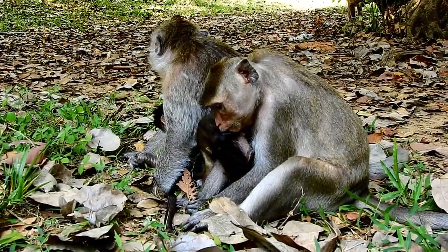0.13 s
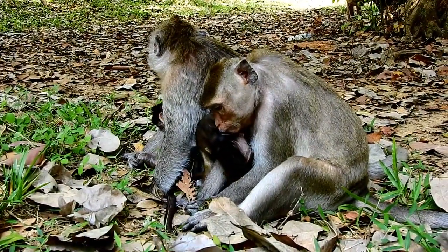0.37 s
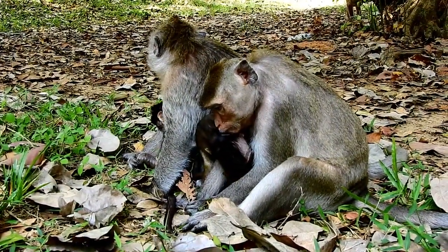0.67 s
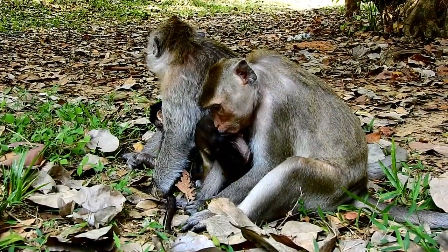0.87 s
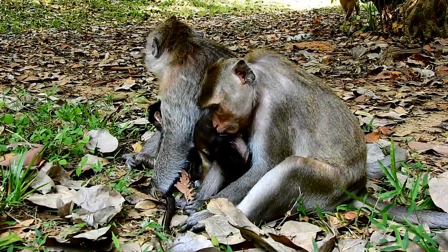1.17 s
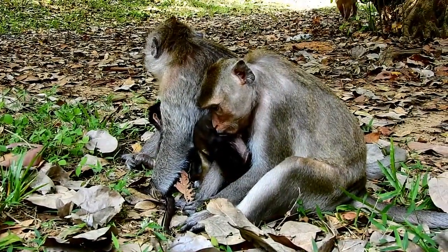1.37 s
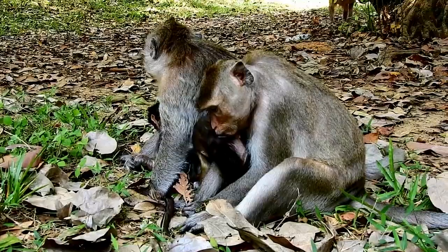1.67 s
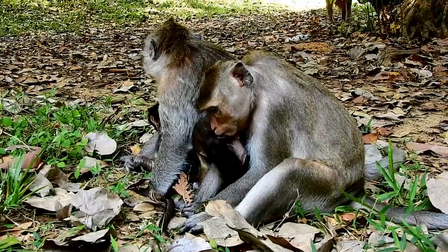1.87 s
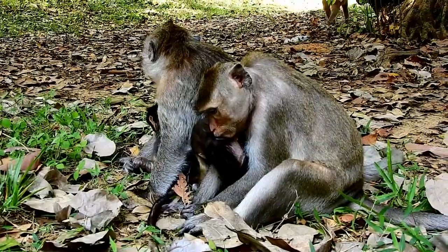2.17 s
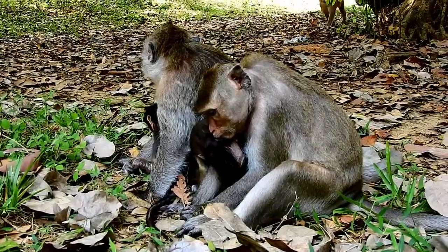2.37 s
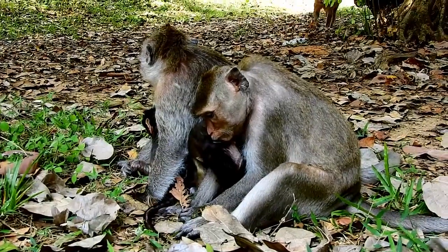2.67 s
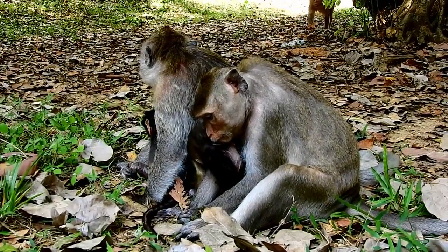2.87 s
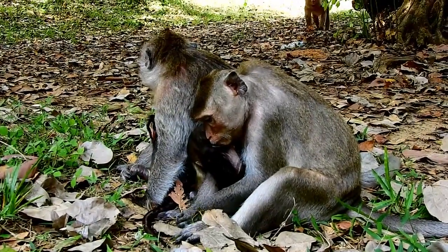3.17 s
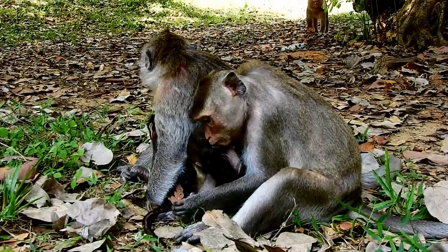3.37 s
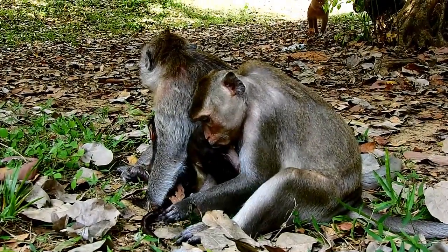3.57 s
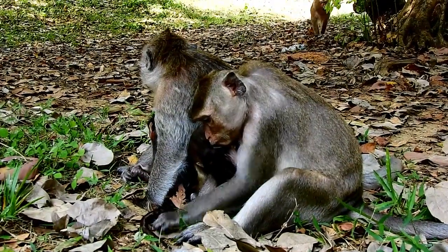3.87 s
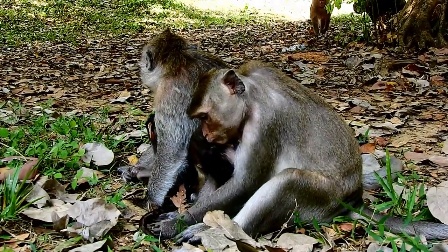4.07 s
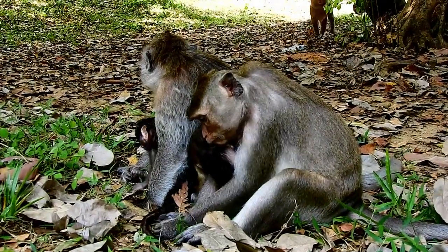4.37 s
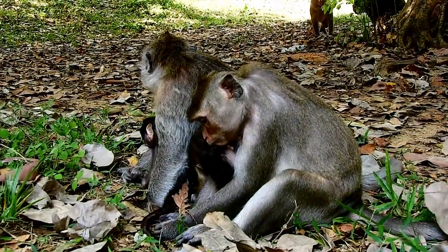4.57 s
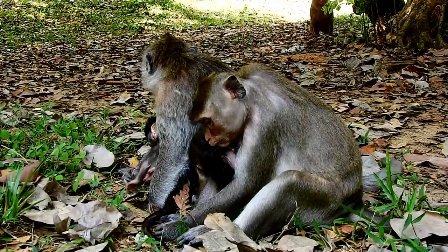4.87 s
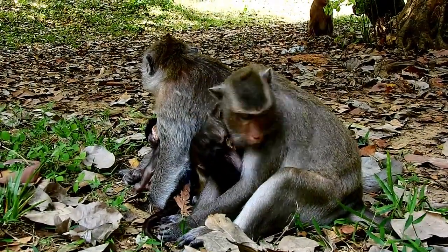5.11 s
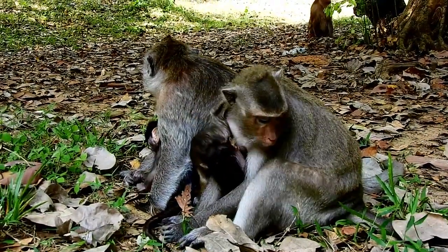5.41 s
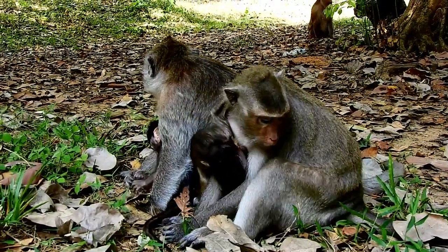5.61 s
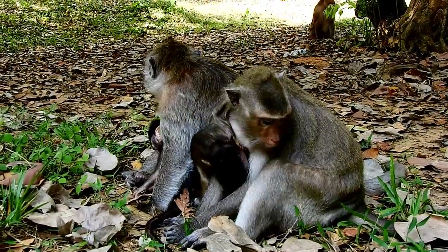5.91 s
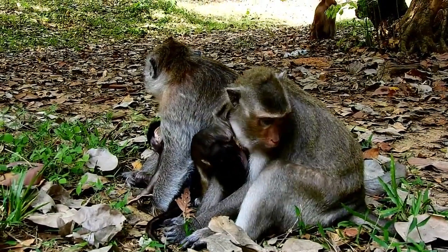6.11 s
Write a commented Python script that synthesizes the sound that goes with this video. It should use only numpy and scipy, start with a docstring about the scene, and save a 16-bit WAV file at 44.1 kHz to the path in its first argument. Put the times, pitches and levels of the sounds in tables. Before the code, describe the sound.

Steady buzzing insects cover faraway idling and passing motors; quick upward bird chirps open the scene and two slower ones return near the end.

```python
"""A forest edge: cicadas drone throughout, a noise chorus combed into a buzz near 3.5 kHz under a wide, high sizzle.
Far off an engine idles as summed exhaust sines, over noise-band traffic rumble, leaf hiss and a faint breeze.
A small bird, a swept sine, at once gives a run of thin rising chirps with faint level pips; a motorbike passes.
About two seconds in, the shrillest insect eases; later come more pips and a far vehicle's rising drone.
Near the end the bird gives a second, drawn-out run of chirps, while other motors' hums still swell."""
import sys
import numpy as np
from scipy import signal
from scipy.fft import rfft, irfft, next_fast_len
from scipy.io import wavfile
from scipy.ndimage import uniform_filter1d, map_coordinates

SR = 44100
rng = np.random.default_rng(int(sys.argv[2]) if len(sys.argv) > 2 else 0)


def log_audio(samples):
    """Write samples as a 16-bit WAV file to the path given in sys.argv[1]."""
    # one column per channel
    frames = np.atleast_2d(samples).T
    # limit to full scale, then quantise
    limited = np.clip(frames, -1, 1)
    pcm = np.round(limited * 32767).astype(np.int16)
    wavfile.write(sys.argv[1], SR, pcm)


N = 275625
TIME = np.arange(N) / SR  # s


def amp(db):
    """Decibels to a linear gain."""
    return 10 ** (np.asarray(db) / 20)


def unit(x):
    """The signal scaled to rms 1."""
    return x / np.sqrt(np.mean(x ** 2) + 1e-20)


def along(points, hz):
    """Reads a curve of (Hz, value) points on a log frequency axis."""
    f, v = np.transpose(points)
    return np.interp(np.log(hz + 1), np.log(f + 1), v)


def wobble(rate):
    """A smooth random curve through unit-variance knots, rate knots a second."""
    knots = rng.standard_normal(int(N * rate / SR) + 4)
    return map_coordinates(knots, [TIME * rate])


def swell(peak_s, spread_s):
    """A bell-shaped rise and fall of height 1; spread_s is its standard deviation."""
    return np.exp(-.5 * ((TIME - peak_s) / spread_s) ** 2)


def filtered(x, response):
    """Shapes a signal's spectrum by a response of frequency."""
    m = next_fast_len(N + SR // 2)  # room for tails
    return irfft(rfft(x, m) * response(np.fft.rfftfreq(m, 1 / SR)), m)[..., :N]


def resonances(modes, hz):
    """Summed gain of steep-sided resonances, each (centre Hz, width Hz, dB)."""
    return sum(amp(db) * (hz * w) ** 2 / ((c * c - hz * hz) ** 2 + (hz * w) ** 2) for c, w, db in modes)


def surround(pair, colour):
    """Mixes two unrelated signals into a coloured field at two close microphones, rms 1."""
    # likeness of left and right: pitch_hz, correlation (-1 to 1)
    likeness = [(25, .5), (55, .95), (110, .995), (450, .97), (1000, .91), (2000, .84), (3700, .83),
                (4700, .68), (5600, .38), (6800, .1), (7700, -.27), (8600, -.4), (12000, -.15)]
    # left-right balance: pitch_hz, left_minus_right_db
    balance = [(30, 4), (100, 1.5), (1700, 1.2), (3500, 2.5), (4600, 1.3), (5600, 0.5), (6600, -2),
               (7700, 1.5), (12000, 0.5)]

    def mid_side_gains(hz):
        turn = np.arccos(np.clip(along(likeness, hz), -1, 1)) / 2
        return colour(hz) * np.array([np.cos(turn), np.sin(turn)])

    mid, side = filtered(pair, mid_side_gains)
    stereo = np.array([mid + side, mid - side])
    return unit(filtered(stereo, lambda hz: amp(np.outer([.5, -.5], along(balance, hz)))))


def patchy(depth_db):
    """Two noises that share time-frequency patches of random gain."""
    z = signal.stft(rng.standard_normal((2, N)), nperseg=512)[2]
    field = rng.standard_normal(z.shape[1:])
    field = uniform_filter1d(field, size=4, axis=0)  # across frequency
    field = uniform_filter1d(field, size=20, axis=1)  # across time
    return signal.istft(z * amp(depth_db * unit(field)), nperseg=512)[1][:, :N]


def harmonics(hz):
    """Broad spectral lines at the multiples of the tymbal click rate."""
    # depth of the buzz lines: pitch_hz, depth (share 0-1)
    line_depth = [(3100, 0), (3400, 0.83), (3650, 0.84), (3850, 1)]
    click_hz = 96.8
    depth = np.clip(along(line_depth, hz), 0, .99)
    return np.sqrt(1 + depth * np.cos(2 * np.pi * hz / click_hz))


def cicadas():
    """The forest smears the tymbal clicks into a smooth drone; only the nearer insects keep their harmonics."""
    # ring of the near tymbals: centre_hz, width_hz, gain_db
    near_ring = [(3520, 570, 10), (3720, 81, -5), (3911, 52, 8)]
    # blurred ring of the far chorus: centre_hz, width_hz, gain_db
    far_ring = [(1758, 356, -5.5), (3340, 520, -1.5)]
    near = surround(patchy(depth_db=0.65), lambda hz: resonances(near_ring, hz) * harmonics(hz))
    far = surround(patchy(depth_db=1.2), lambda hz: resonances(far_ring, hz))
    return amp(-45.5) * near + amp(-49) * far


def sizzle():
    """A high chorus merges into a sizzle; one shrill insect on top of it, with a thin whine, backs off."""
    # spectrum of the crowd: pitch_hz, level_db (relative, per Hz)
    crowd_band = [(2600, -46), (3930, -40), (4060, -8), (4300, -5), (4700, -6.5), (5200, -.5), (6100, -1),
                  (6750, 1), (7300, -1.5), (7900, -6.5), (8600, -13.5), (9200, -24), (11000, -39.5),
                  (13000, -90)]
    shrill_hz, shrill_width_hz, shrill_db, shrill_drop_db = 7740, 130, -55, 2
    whine_hz, whine_db, whine_drop_db = 7629, -64, 7
    ease_start_s, ease_length_s = 2, .5
    eased = np.clip((TIME - ease_start_s) / ease_length_s, 0, 1)

    crowd = surround(patchy(depth_db=0.76), lambda hz: amp(along(crowd_band, hz)))
    ring = [(shrill_hz, shrill_width_hz, 0)]
    shrill = surround(patchy(depth_db=3.0), lambda hz: resonances(ring, hz))
    drift = np.array([wobble(12), wobble(12)])  # phase in radians, left and right
    whine = unit(np.sin(2 * np.pi * whine_hz * TIME + drift))

    shrill_gain = amp(shrill_db - shrill_drop_db * eased)
    whine_gain = amp(whine_db - whine_drop_db * eased)
    return amp(-39.5) * crowd + shrill_gain * shrill + whine_gain * whine


def idling_engine():
    """An idling engine picks up a little while it fades; only its low exhaust orders carry this far."""
    # engine speed: time_s, firing_hz
    speed = [(0, 26.3), (1.9, 26), (3.5, 26.6), (4.3, 26.85), (5.3, 27.35), (6.25, 27.9)]
    # exhaust orders: multiple of the firing rate, level_db (before waver and fade)
    orders = [(2, -54), (3, -53), (4, -44.5), (5, -43), (6, -43.5), (7, -50), (8, -58), (9, -57.5),
              (11, -59.5)]
    fade_db_per_s = 0.55
    phase = 2 * np.pi * np.cumsum(np.interp(TIME, *np.transpose(speed))) / SR
    idle = np.zeros(N)
    for multiple, db in orders:
        level = amp(db + 2.5 * wobble(3.02))
        idle += level * np.sin(multiple * phase + 0.53 * wobble(1.48))
    return amp(-fade_db_per_s * TIME) * idle


def background():
    """Traffic rumble swells with each passing vehicle and slowly recedes, under a soft hiss of leaves."""
    # rumble spectrum: pitch_hz, level_db (relative, per Hz)
    rumble_band = [(20, -44), (38, -24), (55, -7), (80, -2), (120, 1.5), (170, -2), (240, -7.5), (310, -12),
                   (375, -21), (450, -15), (560, -20), (720, -25), (1100, -25), (1400, -31), (2500, -58)]
    # leafy hiss spectrum: pitch_hz, level_db (relative, per Hz)
    hiss_band = [(300, -8), (1050, -3), (1350, -4), (2000, -2), (2500, -3), (5000, -5), (9000, -14),
                 (11500, -23), (12800, -31.5), (15000, -36)]
    # distant vehicles passing: nearest_s, spread_s, level_db
    vehicles = [(1.45, .66, -41), (3.55, .35, -43)]
    traffic_db, recede_db_per_s = -39.5, 0.36
    steady = amp(traffic_db - recede_db_per_s * TIME)
    passing_power = sum((amp(db) * swell(s, spread_s)) ** 2 for s, spread_s, db in vehicles)
    traffic = np.sqrt(steady ** 2 + passing_power)
    rumble = surround(patchy(depth_db=1.33), lambda hz: amp(along(rumble_band, hz)))
    hiss = surround(patchy(depth_db=2.5), lambda hz: amp(along(hiss_band, hz)))
    return traffic * rumble + amp(-53) * hiss


def breeze():
    """Faint air movement rumbles at each microphone, low noise round 35 Hz."""
    lumps = filtered(patchy(depth_db=4), lambda hz: resonances([(35, 82, 0)], hz))
    return amp([[-63], [-68]]) * unit(lumps)


def note(t, length, hz, hoarse):
    """A thin whistle with a soft start and a quavering pitch; t is the time since it began."""
    attack_s, release_s = .005, .007
    quaver = 1 + hoarse * wobble(600)
    flutter = amp(wobble(120))
    envelope = np.clip(t / attack_s, 0, 1) * np.clip((length - t) / release_s, 0, 1)
    return envelope * flutter * np.sin(2 * np.pi * np.cumsum(hz * quaver) / SR)


def chirps():
    """A pure swelling foot, a break, then a sweep that flicks up: quick and hoarse at first, later drawn out."""
    # rising chirps: start_s, foot_s, break_s, sweep_s, from_hz (before the slide-in), foot_db, sweep_db,
    # fade_db (over the sweep), hoarse (added share of the pitch), flick (share of the sweep left to the last flick)
    calls = [(.007, .018, .013, .072, 4700, -38, -36.5, 8, .034, .55),
             (.251, .023, .016, .07, 4620, -38, -36.5, 8, .034, .65),
             (.513, .018, .006, .048, 4680, -36.5, -35.5, 10, .04, .5),
             (.742, .016, .009, .076, 4680, -40.5, -36, 8.5, .04, .5),
             (.996, .015, .006, .048, 4700, -40.5, -37, 6, .032, .45),
             (5.86, .061, .006, .083, 4400, -37, -38.8, 0, .011, .38),
             (6.128, .073, .006, .097, 4540, -36.5, -38.5, 0, .012, .3)]
    break_hz, top_hz = 4860, 7280
    slide_hz, slide_s = 220, .008  # each chirp slides in from below
    foot_swell_db, break_dip_db = 11, 11
    flick_power = 4.6  # the higher, the later the flick comes
    pure = .003  # the foot barely quavers: share of the pitch
    extra_s = .003 + .007  # hold on the top pitch, then release
    out = np.zeros(N)
    for s, foot_s, break_s, sweep_s, from_hz, foot_db, sweep_db, fade_db, hoarse, flick in calls:
        t = np.maximum(TIME - s, 0)
        foot = np.clip(t / foot_s, 0, 1)
        sweep = np.clip((t - foot_s) / sweep_s, 0, 1)
        climb = (1 - flick) * sweep + flick * sweep ** flick_power
        hz = from_hz + (break_hz - from_hz) * foot + (top_hz - break_hz) * climb
        hz = hz - slide_hz * np.exp(-t / slide_s)

        past_break = (t - foot_s) / break_s
        upper = np.clip(past_break, 0, 1)  # crossfade from pure foot to hoarse sweep
        foot_level = foot_db - foot_swell_db * (1 - foot) ** 2
        db = (1 - upper) * foot_level + upper * (sweep_db - fade_db * sweep)
        dip = np.sin(np.pi * np.clip(past_break / 2, 0, 1)) ** 2
        level = amp(db - break_dip_db * dip)
        out += level * note(t, foot_s + sweep_s + extra_s, hz, pure + hoarse * upper)
    return out


def whistles():
    """Short faint pips on a level pitch that barely quavers."""
    # level pips: start_s, length_s, pitch_hz, level_db
    pips = [(.447, .025, 5640, -38.5), (.494, .014, 5600, -42), (3.625, .021, 5630, -41.5),
            (3.659, .01, 5660, -45), (3.68, .013, 5630, -45)]
    half_release_s = .0035
    return sum(amp(db) * note(TIME - s, length + half_release_s, hz, .003) for s, length, hz, db in pips)


def trees(x, t60):
    """Trunks and leaves scatter a short decaying tail, different at each microphone."""
    t = np.arange(SR // 2) / SR
    tail = rng.standard_normal((2, len(t))) * amp(-60 * t / t60)
    return signal.fftconvolve(x[None], tail / np.linalg.norm(tail[0]), axes=1)[:, :N]


def birds():
    """The ground bounce makes each sweep swell and dip as it climbs; foliage blurs it and adds a faint echo."""
    bounce_s, bounce_gain = .001665, .28
    bounced = filtered(chirps(), lambda hz: 1 + bounce_gain * np.exp(-2j * np.pi * hz * bounce_s))
    song = bounced + whistles()
    echo = amp(-14) * trees(song, t60=.08) + amp(-12) * trees(song, t60=.4)
    return song * amp([[0], [-1]]) + echo


def other_motors():
    """Other motors' hums, wavering sines, swell and beat against the idling engine."""
    # swells of hum: peak_s, spread_s, pitch_hz, level_db (before a 1 dB waver)
    swells = [(.27, .2, 79.8, -39.5), (3.2, .35, 91.8, -46), (3.98, .14, 92.8, -41.5),
              (4.1, .22, 110.4, -42.5), (5.17, .26, 93.3, -41.5), (5.4, .28, 109.6, -43.5),
              (6.03, .19, 94.6, -40.5)]
    hum = np.zeros(N)
    for s, spread_s, hz, db in swells:
        level = amp(db + wobble(2.52)) * swell(s, spread_s)
        hum += level * np.sin(2 * np.pi * hz * TIME + .5 * wobble(1.75))
    return hum


def motorbike():
    """A distant exhaust note drops in pitch by Doppler shift as it passes."""
    nearest_s, spread_s, level_db = 1.1, .6, -41.5
    exhaust_hz, doppler_share, turn_s = 112.5, .085, .45
    hz = exhaust_hz * (1 - doppler_share * np.tanh((TIME - nearest_s) / turn_s))
    level = amp(level_db + wobble(4.4)) * swell(nearest_s, spread_s)
    return level * np.sin(2 * np.pi * np.cumsum(hz) / SR)


def engines():
    """The idling engine, other motors and motorbike share one place, a little to the left."""
    return (idling_engine() + other_motors() + motorbike()) * amp([[.8], [-.8]])


def climbing():
    """The drone of a far vehicle, a narrow band of noise, rises as it gathers speed."""
    loudest_s, spread_s, level_db = 3.85, 0.54, -55.5
    loudest_hz, octaves_per_s, width_hz = 499.4, .8, 260
    hz = loudest_hz * 2 ** (octaves_per_s * (TIME - loudest_s))
    blur = filtered(rng.standard_normal((2, N)), lambda f: 1 / (1 + (2 * f / width_hz) ** 4))
    phase = 2 * np.pi * np.cumsum(hz) / SR
    drone = unit(blur[0] * np.cos(phase) + blur[1] * np.sin(phase))  # noise shifted up to the moving pitch
    return amp(level_db) * swell(loudest_s, spread_s) * drone * amp([[.8], [-.8]])


def scene():
    """Insects, distant motors, a little moving air and a bird."""
    return cicadas() + sizzle() + engines() + background() + breeze() + birds() + climbing()


def record(dry):
    """A sharp band limit leaves nothing above 15.4 kHz."""
    return filtered(dry, lambda hz: hz < 15400)


dry = scene()
out = record(dry)
log_audio(out)
```